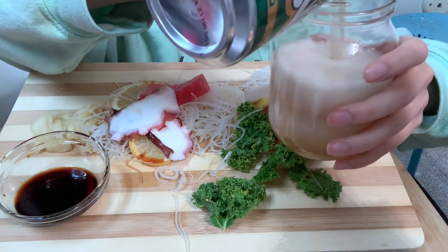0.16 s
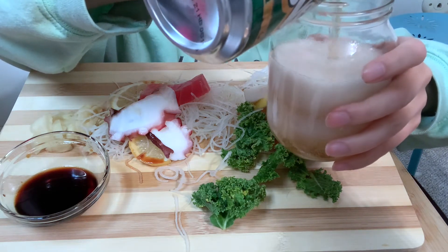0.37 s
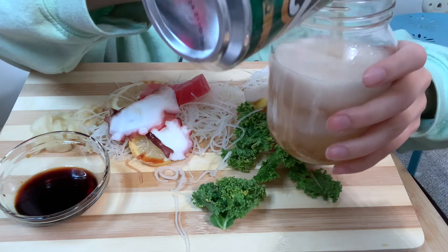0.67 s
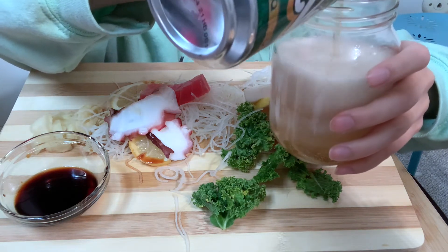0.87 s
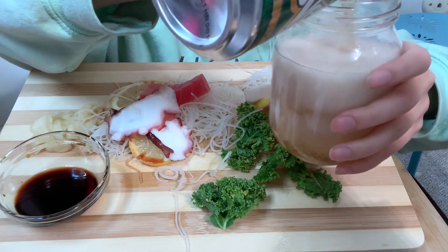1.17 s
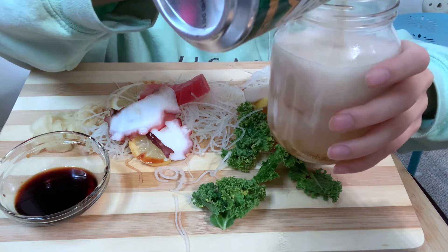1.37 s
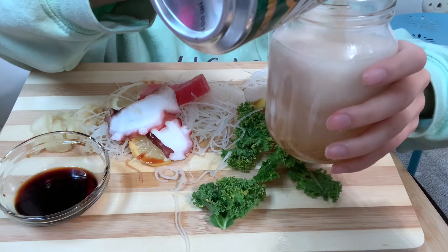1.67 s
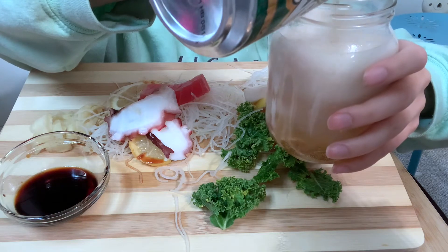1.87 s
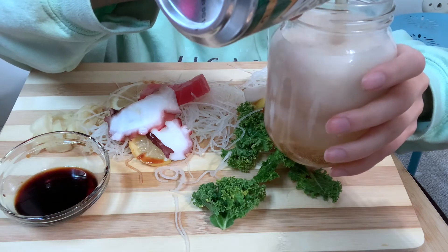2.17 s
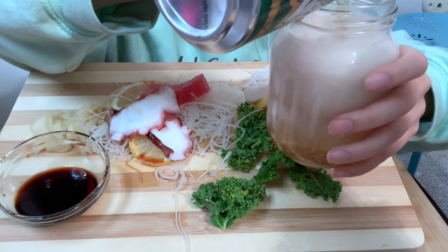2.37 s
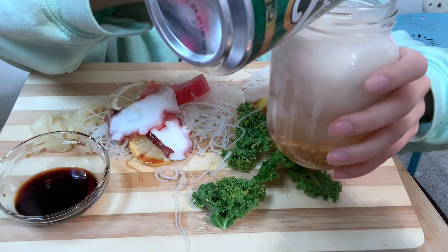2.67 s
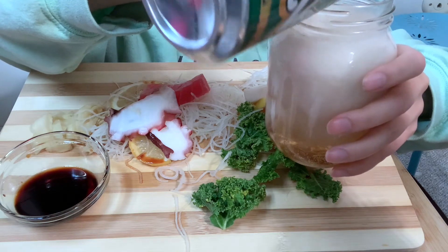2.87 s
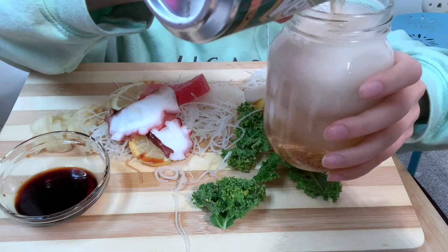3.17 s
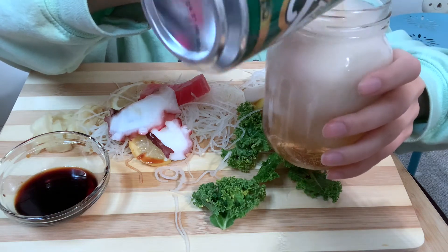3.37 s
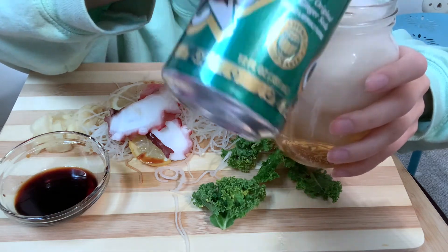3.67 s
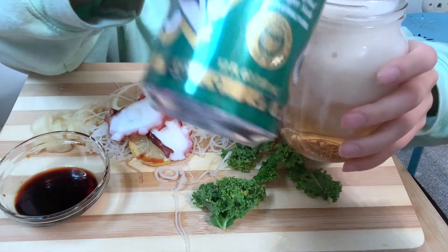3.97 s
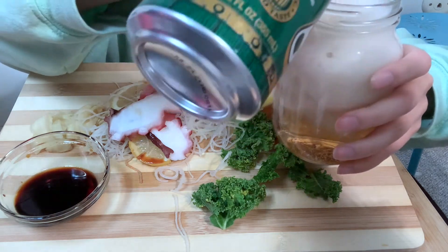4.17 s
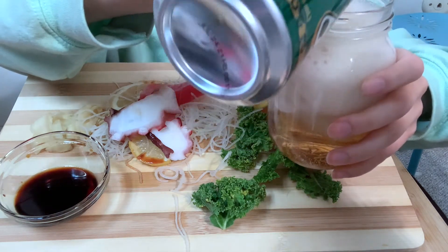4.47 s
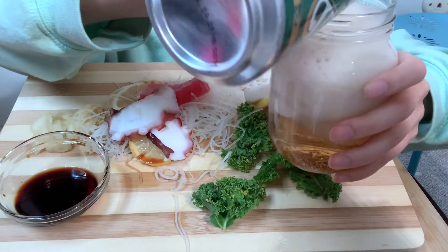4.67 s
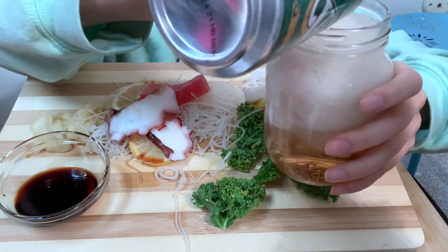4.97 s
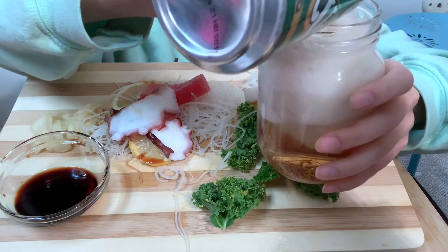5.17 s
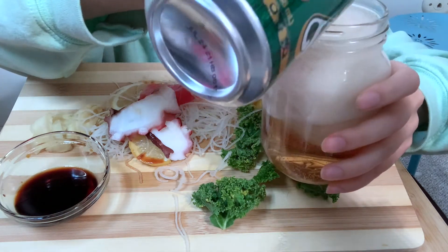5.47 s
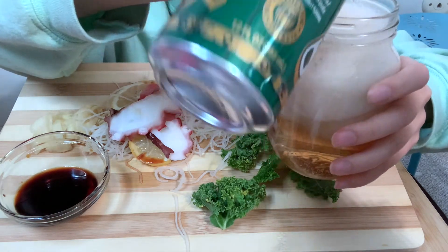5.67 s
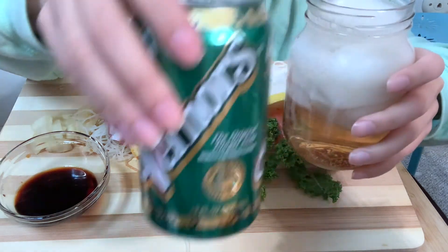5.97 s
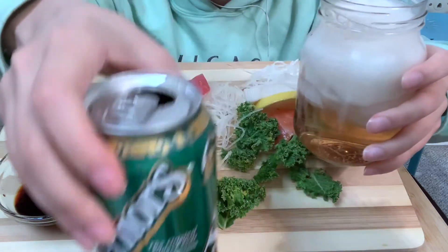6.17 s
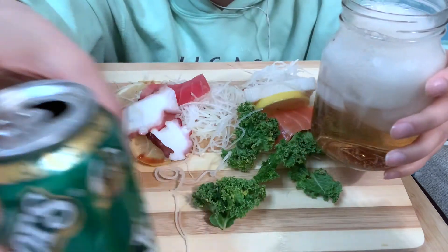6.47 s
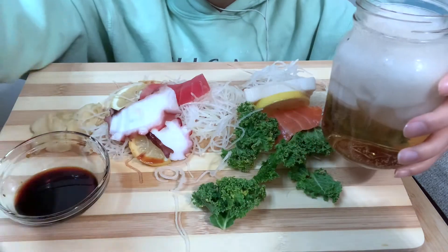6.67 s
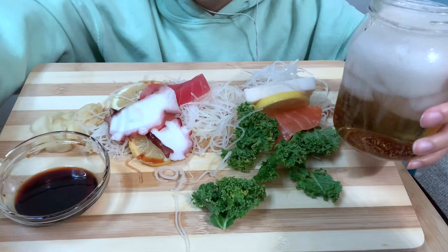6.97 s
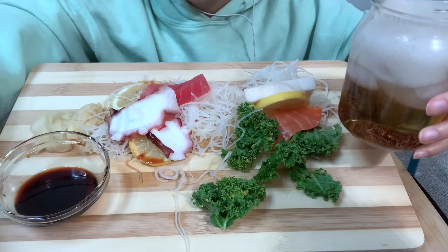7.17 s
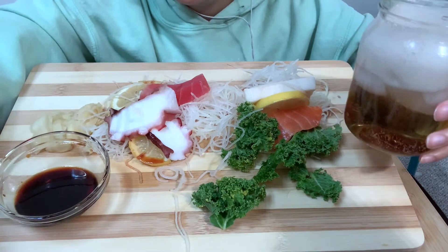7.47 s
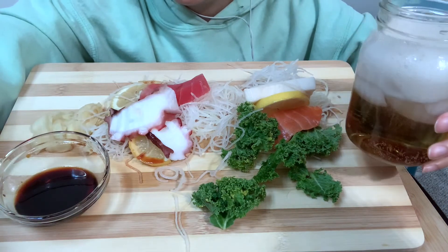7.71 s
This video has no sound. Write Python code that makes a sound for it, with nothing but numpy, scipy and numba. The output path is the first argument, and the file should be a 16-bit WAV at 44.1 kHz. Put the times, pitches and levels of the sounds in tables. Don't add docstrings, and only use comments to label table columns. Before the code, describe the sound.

Close single microphone, dry quiet room with faint low rumble. Carbonated liquid glugs unevenly into a glass jar, with plops, bubbles and thin glass clinks, then runs finer and higher. After about three seconds the pour breaks off; soft foam fizz continues. The nearly empty can gives a short hollow double glug, a few small drops follow, and it finally thumps on the tabletop.

```python
import sys
import numpy as np
from scipy import signal
from scipy.io import wavfile
from numba import njit

SR = 44100
rng = np.random.default_rng(int(sys.argv[2]) if len(sys.argv) > 2 else 0)


def master(y):
    cut = np.clip(np.atleast_2d(y).T, -1, 1)
    pcm = np.round(cut * 32767)
    wavfile.write(sys.argv[1], SR, pcm.astype(np.int16))


def volts_from_decibels(level):
    exponent = np.asarray(level, float) / 20
    return 10 ** exponent


N = 345744


def rms_one(x):
    return x / np.sqrt(np.mean(x ** 2) + 1e-20)


def in_time(rows):
    s, *columns = np.transpose(rows)
    return [np.interp(np.arange(N) / SR, s, c) for c in columns]


def high_pass(x, hz, order=2):
    return signal.sosfilt(signal.butter(order, hz, "high", fs=SR, output="sos"), x)


def band_pass(x, low_hz, high_hz):
    return signal.sosfilt(signal.butter(2, [low_hz, high_hz], "band", fs=SR, output="sos"), x)


def drift(rate):
    r = np.exp(-80 * np.pi * rate / SR)
    slow = signal.lfilter([1], [1, -2 * r, r * r], rng.standard_normal(N // 40 + 2002))[2000:]
    return np.interp(np.arange(N) / 40, np.arange(len(slow)), rms_one(slow))


def pops(per_s, spread_db):
    sizes = volts_from_decibels(spread_db * np.minimum(rng.exponential(1, N), 5)) * rng.choice([-1, 1], N)
    return rms_one(sizes * (rng.random(N) < per_s / SR))


def coloured(sources, spectrum, flicker_db, body_db=0):
    hz, db = np.transpose(spectrum)
    bands = round(3 * np.log2(hz[-1] / hz[0]))
    edges = np.geomspace(hz[0], min(hz[-1], 0.45 * SR), bands + 1)
    out, power, together = 0, 0, drift(2.8)
    for k, (low, high) in enumerate(zip(edges, edges[1:])):
        centre = np.sqrt(low * high)
        level_db = np.interp(np.log(centre), np.log(hz), db)
        flicker = flicker_db * (0.28 * together + drift(25.0))
        band = band_pass(sources[k % 2], low, high) * volts_from_decibels(level_db + flicker)
        power += np.mean(band ** 2)
        out = out + band * volts_from_decibels(body_db / (1 + (centre / 4200) ** 4))
    return out / np.sqrt(power)


@njit
def moving_peak(x, hz, width, sr):
    y = np.zeros(len(x))
    for i in range(2, len(x)):
        r = np.exp(-np.pi * width[i] / sr)
        drive = (1 - r * r) / 2 * (x[i] - x[i - 2])
        y[i] = drive + 2 * r * np.cos(2 * np.pi * hz[i] / sr) * y[i - 1] - r * r * y[i - 2]
    return y


def twice(x, hz, width):
    width = width + 0 * hz
    once = moving_peak(x, hz, width, SR)
    return rms_one(moving_peak(once, hz, width, SR) / np.sqrt(width))


def add(out, s, db, hz, t60, rise, glide=0.):
    i = round(s * SR)
    t = np.arange(min(N - i, round(1.3 * t60 * SR + rise * SR))) / SR
    swell = np.sin(np.pi / 2 * np.minimum(t / rise, 1)) ** 2
    decay = volts_from_decibels(-60 * np.maximum(t - rise, 0) / t60)
    tone = np.sin(2 * np.pi * hz * (t + glide * t * t / t60 / 2))
    out[i:i + len(t)] += volts_from_decibels(db) * swell * decay * tone


def bubbles(count, t0, t1, low_hz, high_hz, cycles, db):
    out = np.zeros(N)
    for when, size, luck in rng.random((count, 3)):
        hz = low_hz * (high_hz / low_hz) ** size
        s = t0 + (t1 - t0) * when
        add(out, s, db - 12 * luck, hz, cycles / hz, rise=cycles / hz / 5, glide=0.109)
    return out


def puff(s, db, low_hz, high_hz, t60):
    since = np.arange(N) / SR - s
    opening = np.clip(since / 0.0046, 0, 1)
    gate = (since > 0) * volts_from_decibels(db - 60 * np.maximum(since, 0) / t60) * opening
    return gate * rms_one(band_pass(rng.standard_normal(N), low_hz, high_hz))


# f/Hz, level/dB [per Hz]
ROOM_TONE = [(15, -67), (25, -49), (49, 0.5), (91, -9), (108, -1), (240, 0.5), (330, -6), (411, -4),
             (712, -37), (800, -46.5), (1040, -68), (1760, -120)]


def room():
    return volts_from_decibels(-62) * coloured(rng.standard_normal((2, N)), ROOM_TONE, flicker_db=4.0)


# t/s, level/dB [peak], f/Hz
JOLTS = [
    (0.575, -50, 60),
    (0.841, -64, 70),
    (1.599, -56, 70),
    (2.488, -45.5, 70),
    (3.118, -38, 74),
    (4.352, -46, 70.5),
    (4.47, -45, 70.6),
]


def jolts():
    out = np.zeros(N)
    for s, db, hz in JOLTS:
        add(out, s, db, hz, 0.36 / hz, rise=1.29 / hz)
    return out


def pockets():
    per_s, t60_s = 9.0, 0.13
    out = np.zeros(N)
    for hz in np.geomspace(7500, 15000, 9):
        tears = np.abs(pops(per_s, spread_db=1.5))
        gate = signal.lfilter([1], [1, -volts_from_decibels(-60 / (t60_s * SR))], tears)
        gate = signal.lfilter([0.01], [1, -0.99], gate)
        out += band_pass(gate * rng.standard_normal(N), hz * 0.965, hz * 1.035)
    return volts_from_decibels(-23) * rms_one(out)


# t/s, level/dB
FOAM = [(0, -47.5), (.37, -48.5), (.83, -51.5), (1.44, -47.5), (2.49, -46), (2.86, -47.5), (3.6, -49.5),
        (3.82, -52.5), (4.34, -51), (4.63, -49), (5.31, -51), (5.57, -49), (6.11, -52.5), (6.79, -53),
        (7.23, -55.5), (7.84, -51)]
# f/Hz, level/dB [per Hz]
FOAM_COLOUR = [(290, -13.5), (500, -12), (640, -10), (987, -5), (1230, 5.5), (1340, -6.5), (1460, -5),
               (1790, 0), (2490, -4.5), (2720, -2), (4020, -4.5), (5450, -8.5), (6970, -8.5),
               (10200, -19.5), (15900, -19)]


def foam():
    empty_hz, empty_db, db_per_octave = 810, -12, 7
    body_db = empty_db + db_per_octave * np.log2(in_time(FILL)[0] / empty_hz)
    bursts = [rng.standard_normal(N) + 0.53 * pops(2500, spread_db=4.5) for _ in range(2)]
    hiss = coloured(bursts, FOAM_COLOUR, flicker_db=0.92, body_db=body_db)
    pinpricks = bubbles(count=320, t0=0, t1=8.1, low_hz=7370, high_hz=15960, cycles=220, db=-19)
    crackle = volts_from_decibels(-30) * high_pass(pops(150, spread_db=3.), 9000)
    drying = volts_from_decibels(np.interp(np.arange(N) / SR, [2.5, 5.], [0, 4.5]))
    return volts_from_decibels(in_time(FOAM)[0] + 5.5) * (hiss + pinpricks + drying * (crackle + pockets()))


# t/s, low ring level/dB [peak], high ring level/dB, high ring f/Hz
TICKS = [(.3202, -45, -54, 5050), (.4239, -39, -49, 5550), (0.7473, -26.5, -28.5, 5510),
         (0.84, -46, -30, 5840), (.963, -22, -55, 5640), (1.497, -27.5, -47, 5800),
         (1.5116, -38, -40, 5210), (1.6066, -41, -40, 5400), (2.0315, -41, -26, 5620),
         (2.0383, -30, -28, 5600), (2.223, -41, -35.5, 5600), (2.302, -35, -50, 5540),
         (5.8586, -34.5, -53, 5670)]
GLASS_HZ = (3346, 4550, 6800)
GLASS_T60_S = (0.027, 0.013, 0.0082)


def ticks():
    out = np.zeros(N)
    for s, low_db, high_db, high_hz in TICKS:
        add(out, s, low_db, GLASS_HZ[0], GLASS_T60_S[0], rise=0.0014)
        add(out, s, high_db - 11.5, GLASS_HZ[1], GLASS_T60_S[1], rise=0.0014)
        add(out, s, high_db + 2.0, high_hz, 0.013, rise=0.0013)
        add(out, s, high_db - 6.5, GLASS_HZ[2], GLASS_T60_S[2], rise=0.0011)
    return out


# t/s, level/dB [peak], hollow f/Hz, overtones level/dB, swell/s
GLUGS = [(3.249, -53.5, 297, -17, 0.035), (4.346, -32.5, 390, 2, 0.0048), (4.3557, -17, 385, -0.5, 0.0031),
         (4.3575, -24.5, 301, -4, 0.014), (4.366, -15, 382, -19, 0.008), (4.3763, -17.5, 384, -19, 0.013),
         (4.465, -32, 291, -19, 0.0012), (4.466, -22, 391.7, -11.5, .0019), (4.478, -25, 392, -25, 0.012),
         (4.62, -49, 378, -42, 0.043), (4.859, -34, 317, -30, 0.0063), (4.905, -29.5, 335, -16, 0.0068),
         (5.621, -53, 416, -12, 0.014)]
# f/Hz, level/dB, t60/s, delay/s
CAN_WALL = [(612, -9, 0.1, .001), (668, -11, 0.15, 0.00384), (830, -13, 0.04, 0.00294),
            (1024, -17, 0.16, .016), (1650, -15.5, 0.028, 0.00399), (2400, -19, 0.017, 0.00197)]
# t/s, level/dB, f/Hz, half length/s
SQUEAKS = [
    (4.349, -46.5, 13100, 0.0082),
    (5.951, -46, 15700, .003),
]


def can():
    gush_s = GLUGS[1][0]
    out = puff(gush_s, -34.5, 300, 1600, t60=0.22) + puff(gush_s, -42, 1600, 3100, t60=0.08)
    chance = rng.normal(0, 1.5, (len(GLUGS), len(CAN_WALL)))
    for (s, db, hz, over_db, rise), luck in zip(GLUGS, chance):
        add(out, s, db, hz, 0.1 + 1.6 * rise, rise, glide=0.0063)
        for (wall_hz, wall_db, wall_t60, late), more_db in zip(CAN_WALL, luck):
            add(out, s + late, db + over_db + wall_db + more_db, wall_hz, wall_t60, rise)
    out *= volts_from_decibels(1.5 * drift(30))
    for s, db, hz, half in SQUEAKS:
        rub = twice(rng.standard_normal(N), np.full(N, hz * 1.), 1890)
        out += volts_from_decibels(db) * np.exp(-((np.arange(N) / SR - s) / half) ** 2) * rub
    return out


# t/s, level/dB, dulling/dB [per octave above 150 Hz]
SET_DOWN = [
    (7.6729, -18, 3),
    (7.6752, -1, 0.5),
    (7.6808, -13, -2),
    (7.685, -12.5, 6),
    (7.706, -22, 9),
]
# f/Hz, level/dB, t60/s
TABLE = [(102, 0.5, 0.2), (116.4, -13, 0.47), (145, 6.5, 0.11), (186, -8, 0.18), (291, -3.5, 0.16),
         (350, -11.5, 0.15), (420, 3, 0.043), (453, -11, 0.13), (558, 6.5, 0.041), (851, -3.5, 0.04),
         (990, -7.5, 0.045), (1426, -23, 0.039), (1750, -12.5, 0.02), (2630, -30, 0.017)]


def set_down():
    touch_s = SET_DOWN[0][0]
    out = puff(touch_s, -22, 110, 540, t60=0.24) + puff(touch_s, -46, 900, 2800, t60=0.053)
    chance = rng.normal(0, 1.5, (len(SET_DOWN), len(TABLE)))
    for (s, db, dull_db), luck in zip(SET_DOWN, chance):
        for (hz, mode_db, t60), more_db in zip(TABLE, luck):
            late = (hz < 200) * 0.5 / hz
            loss_db = 9.5 + dull_db * np.clip(np.log2(hz / 150), 0, 2)
            add(out, s + late, db + mode_db + more_db - loss_db, hz, t60, rise=0.5 / hz)
    return out


def gurgle():
    t = np.arange(N) / SR
    hollow_hz = 385 - 45 * np.clip(t - 2.75, 0, 1) / 0.25
    fade = np.clip(np.minimum(t - 2.05, 3.02 - t) / 0.06, 0, 1)
    hum = twice(rng.standard_normal(N), hollow_hz, 45) * fade
    fine = bubbles(count=260, t0=1.75, t1=2.9, low_hz=600, high_hz=1700, cycles=8.0, db=-45.5)
    return fine + volts_from_decibels(-66.0) * hum


# t/s, level/dB [peak], f/Hz
SMACKS = [(0.576, -17.5, 694), (.685, -18, 714), (0.8403, -23, 780), (1.113, -33, 1050), (1.226, -27, 900),
          (1.303, -39, 1050), (1.16, -38, 700), (1.334, -24, 1000), (1.712, -24, 756), (1.774, -48, 600),
          (1.894, -34, 700), (1.964, -35, 790), (2.032, -38, 750), (2.052, -39, 500), (2.069, -25.5, 1110),
          (2.114, -25.5, 1050), (2.388, -37, 765), (2.437, -41, 700), (2.525, -30.5, 660),
          (2.644, -30, 1000), (2.789, -29, 1000), (2.835, -35, 970), (5.21, -37, 810), (5.38, -39, 706),
          (5.86, -37.5, 750)]


def plops():
    out = bubbles(count=110, t0=0, t1=1.8, low_hz=327, high_hz=1000, cycles=4.8, db=-40.0)
    for s, db, hz in SMACKS:
        add(out, s, db, hz, 4.6 / hz, rise=0.77 / hz)
    return high_pass(out, 150)


# t/s, level/dB
STREAM = [(0, -48.5), (.35, -49), (.71, -51.5), (1.5, -44.5), (1.75, -44.5), (2.2, -43.5), (2.36, -44),
          (2.53, -41.5), (2.69, -46.5), (3.1, -47), (3.25, -52.5), (3.5, -51.5), (3.75, -54.5),
          (4.2, -52.5), (4.65, -49.5), (5.2, -54), (6.5, -52.5), (7.84, -57.5)]
# t/s, lowest f/Hz, width/Hz
FILL = [(0, 810, 290), (.5, 893, 284), (1, 933, 314), (1.2, 1040, 334), (1.6, 1082, 373), (2, 1196, 620),
        (2.25, 1300, 845), (2.5, 1610, 400), (2.7, 1650, 396), (3.15, 1734, 400), (3.35, 2000, 450),
        (3.7, 2170, 897), (4.6, 2210, 1190), (6.4, 2320, 1250), (6.9, 2120, 1100), (7.84, 1820, 845)]
# t/s, f/Hz, width/Hz, level/dB [against the stream]
CROSS = [(0, 2530, 500, -8), (1.02, 2620, 500, -7.5), (1.07, 2670, 350, -4), (1.5, 2880, 453, -7),
         (2, 3170, 450, -6), (2.3, 3270, 400, -7.5), (2.7, 3420, 450, -6.5), (3.2, 3400, 500, -7.5),
         (3.6, 3400, 640, -8), (7.84, 3390, 640, -8.5)]


def air_space():
    (low_hz, width), (stream_db,), t = in_time(FILL), in_time(STREAM), np.arange(N) / SR
    sputter = rng.standard_normal(N) + 0.6 * pops(1200, spread_db=3.)
    heave = 1 + 0.025 * drift(25)
    lowest = twice(sputter, low_hz * heave, width) * volts_from_decibels(1.0 * drift(18))
    cross_hz, cross_width, cross_db = in_time(CROSS)
    cross = volts_from_decibels(stream_db + cross_db) * twice(sputter, cross_hz * heave ** 0.63, cross_width)
    muffled = np.clip(np.minimum(t - 1.9, 3.5 - t) / 0.11, 0, 1)
    upper_db = -59 - 10 * muffled - 2.7 * np.maximum(t - 4.0, 0)
    upper = volts_from_decibels(upper_db) * twice(sputter, np.full(N, 4270.), 630)
    shoulder = volts_from_decibels(-58.5 - 6.4 * t) * twice(sputter, np.full(N, 3200.), 250)
    kicks, landings = np.zeros(N), GULPS + SPLASHES
    kicks[[round(row[0] * SR) for row in landings]] = volts_from_decibels(np.array([row[1] for row in landings]) - 23)
    slosh = signal.lfilter([1], [1, -volts_from_decibels(-60 / (0.12 * SR))], kicks)
    sputter_db = 1.5 * drift(12)
    return (volts_from_decibels(stream_db + sputter_db) + slosh) * lowest + cross - upper - shoulder


# t/s, level/dB [peak], air ring f/Hz, bubble f/Hz, bubble level/dB
GULPS = [(.321, -15.5, 842, 360, -33), (.332, -24, 836, 604, -52), (.347, -26, 880, 486, -41),
         (.425, -17.5, 851, 1500, -42), (.44, -24, 856, 487, -39), (.575, -18, 1060, 382, -26),
         (0.684, -12, 857, 562, -27), (0.756, -30.5, 1080, 280, -48), (0.8409, -7, 843, 580, -25),
         (.849, -14.5, 1020, 326, -32), (.888, -25, 830, 533, -51), (.961, -22.5, 974, 237, -61),
         (1.036, -27, 954, 598, -54), (1.237, -27, 1100, 536, -43.5), (1.245, -21, 1080, 535, -47),
         (1.257, -24, 1065, 390, -56), (1.353, -25, 1165, 604, -48), (1.366, -17.5, 1117, 1430, -40),
         (1.386, -26.5, 1080, 600, -47), (1.473, -21, 1064, 600, -37), (1.498, -27, 1140, 384, -36.5),
         (1.532, -23, 1100, 604, -41), (1.551, -12, 1057, 606, -36.5), (1.597, -16, 1030, 625, -35)]
# t/s, level/dB [peak], bubble f/Hz, bubble level/dB
SPLASHES = [(.045, -42, 473, -41), (0.068, -31, 450, -70), (.164, -40, 409, -63), (.22, -31, 256, -59),
            (0.38, -35, 380, -45), (0.601, -41, 256, -46), (.996, -46, 232, -48), (1.113, -33, 392, -58),
            (1.192, -34.5, 587, -63), (1.211, -38, 520, -40), (1.279, -31, 420, -63),
            (1.333, -41, 1600, -52), (1.396, -33, 375, -44), (1.574, -30, 598, -60), (1.663, -41, 509, -62),
            (1.715, -35, 350, -39), (1.841, -33, 290, -63), (2.067, -35, 350, -52),
            (2.114, -34, 400, -45.5), (2.385, -39, 320, -61), (2.481, -45, 257, -40.5),
            (2.495, -22.5, 250, -44), (2.526, -29, 305, -54), (2.56, -30, 229, -62),
            (2.577, -29.5, 368, -53), (2.857, -32, 382, -57), (2.99, -41, 330, -64),
            (3.089, -35.5, 500, -66), (3.12, -37, 182, -37)]
# t/s, level/dB [peak], air ring f/Hz, bubble f/Hz, bubble level/dB
REBOUNDS = [(.340, -27, 950, 300, -61), (.355, -36, 940, 450, -50), (.452, -35, 940, 400, -51),
            (.476, -38, 870, 300, -65), (.583, -37, 890, 280, -34.5), (.598, -36, 970, 380, -52),
            (.604, -38, 1000, 350, -54), (0.611, -40, 990, 450, -51), (.660, -44, 980, 300, -65),
            (.672, -44, 950, 300, -65), (0.692, -25, 894, 350, -48), (.699, -28, 870, 280, -47),
            (.712, -40, 1070, 600, -44), (.748, -35.5, 700, 500, -48), (.784, -40, 1050, 250, -60),
            (.857, -23, 954, 330, -54), (.865, -28, 946, 500, -58), (.877, -31, 937, 350, -48),
            (.893, -35, 1000, 500, -60), (.904, -38, 950, 500, -64), (1.131, -35, 974, 450, -56),
            (1.266, -31, 1050, 400, -62), (1.375, -36, 1150, 500, -62), (1.401, -37, 1090, 380, -57),
            (1.456, -41, 1100, 400, -56), (1.483, -30, 1100, 500, -54), (1.491, -30, 1170, 382, -46),
            (1.505, -29, 1040, 377, -47), (1.515, -34, 1110, 300, -47), (1.563, -30, 1080, 300, -60),
            (1.586, -37, 1000, 246, -49), (1.609, -38, 1090, 280, -55), (1.624, -40, 1110, 400, -66),
            (1.698, -32, 1080, 298, -63), (2.168, -37, 1310, 600, -65), (2.36, -32, 1540, 400, -65),
            (2.412, -36, 1600, 400, -68), (2.508, -30, 1750, 250, -53), (2.517, -30, 1700, 400, -62),
            (2.541, -34, 1650, 400, -56)]


def gulps():
    out, light = np.zeros(N), []
    fill_s, fill_hz = np.transpose(FILL)[:2]
    for s, db, bubble_hz, bubble_db in SPLASHES:
        hz = np.interp(s, fill_s, fill_hz) * (1 + 0.05 * rng.standard_normal())
        light.append((s, db, hz, bubble_hz, bubble_db))
    for s, db, hz, bubble_hz, bubble_db in GULPS + light + REBOUNDS:
        t60 = 0.034 * volts_from_decibels(-0.37 * abs(db + 31))
        add(out, s, db, hz, t60, rise=0.0032, glide=0.021)
        add(out, s, bubble_db + 9.5, bubble_hz, 8.9 / bubble_hz, rise=0.0019, glide=0.043)
    return high_pass(out, 150)


def scene():
    knocks = high_pass(plops() + can() + set_down(), 80, order=4)
    pour = foam() + air_space() + gulps() + gurgle()
    return (pour + ticks() + knocks + jolts() + room())[None]


def low_pass(x):
    return signal.sosfilt(signal.butter(12, 15800, fs=SR, output="sos"), x)


def record(dry):
    over_db = np.maximum(20 * np.log10(np.abs(dry[0]) + 1e-9) + 12, 0) * 0.5
    slope = 30 * np.arange(N) / SR
    duck_db = np.maximum.accumulate(over_db + slope) - slope
    duck_db = signal.lfilter([0.004], [1, -0.996], duck_db)
    capsule = signal.butter(2, 15000, fs=SR, output="sos")
    rounded = np.tanh(signal.sosfilt(capsule, dry) * volts_from_decibels(-duck_db))
    top_cut = signal.ellip(10, 0.3, 55, 15740, fs=SR, output="sos")
    return low_pass(signal.sosfilt(top_cut, rounded))


dry = scene()
out = record(dry)
master(out)
```